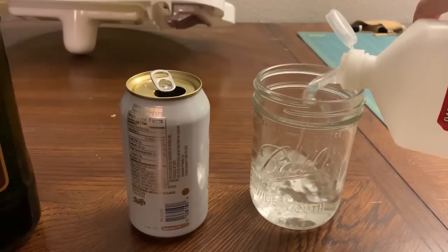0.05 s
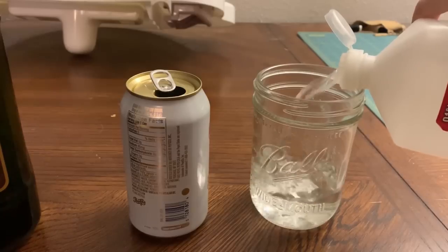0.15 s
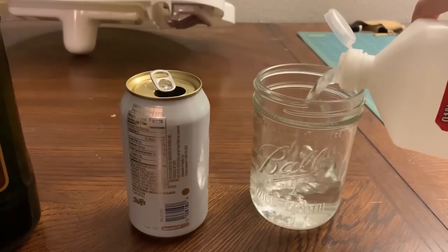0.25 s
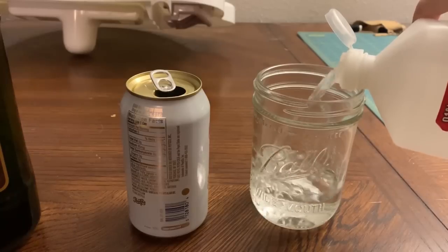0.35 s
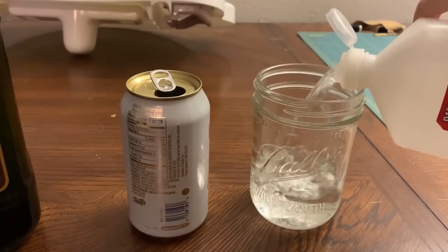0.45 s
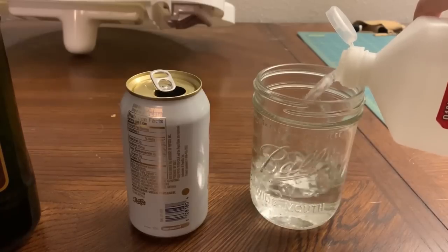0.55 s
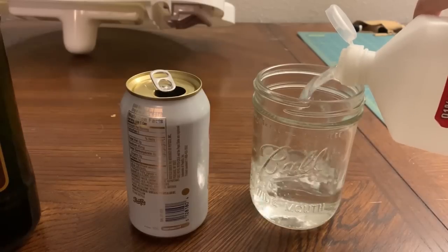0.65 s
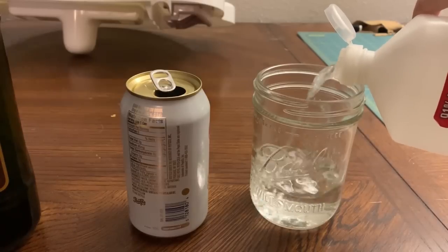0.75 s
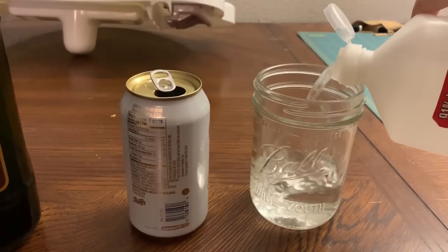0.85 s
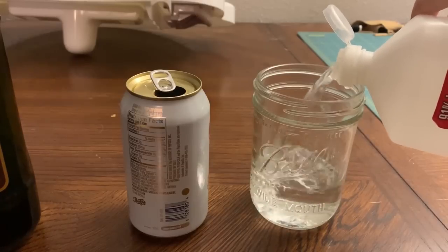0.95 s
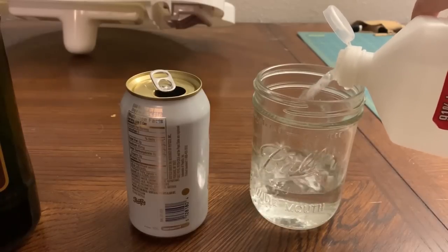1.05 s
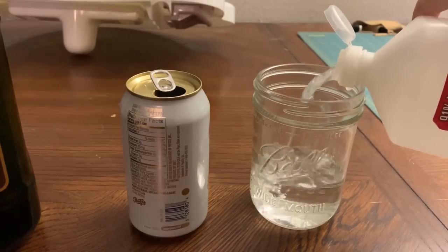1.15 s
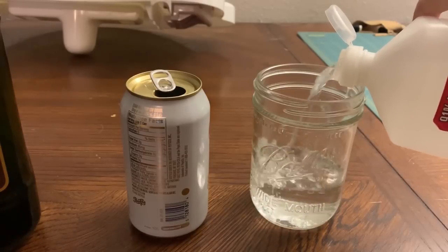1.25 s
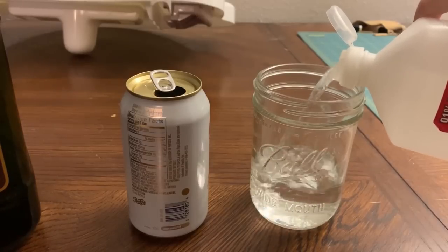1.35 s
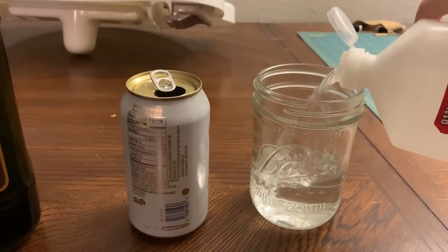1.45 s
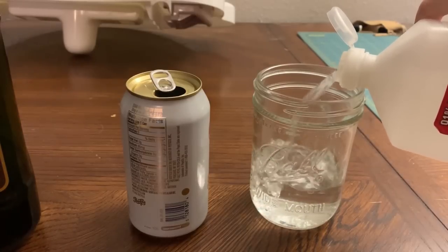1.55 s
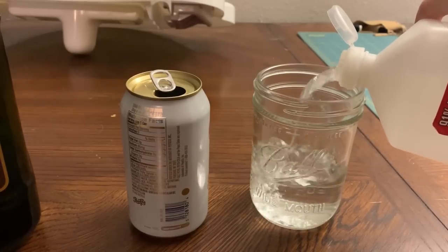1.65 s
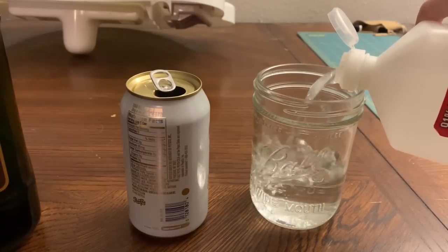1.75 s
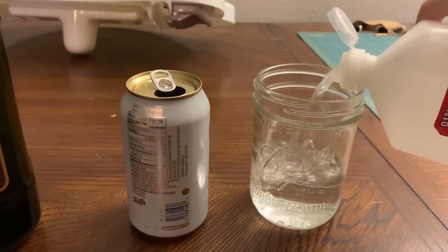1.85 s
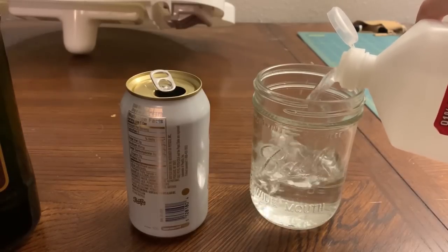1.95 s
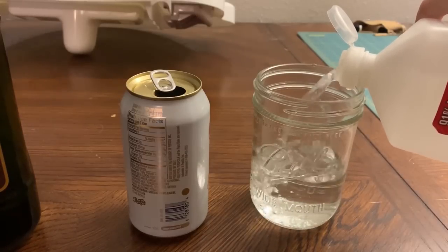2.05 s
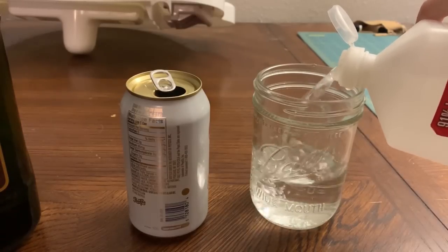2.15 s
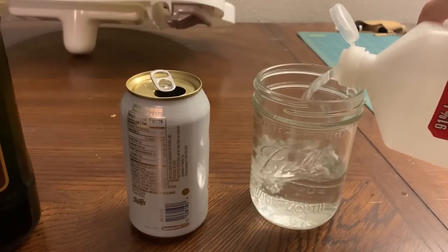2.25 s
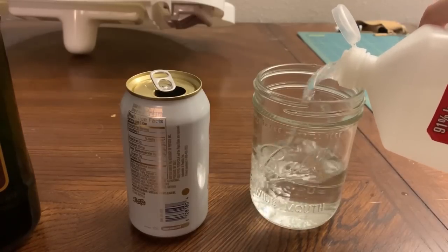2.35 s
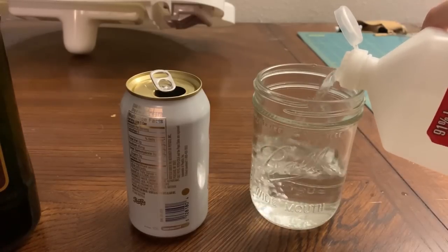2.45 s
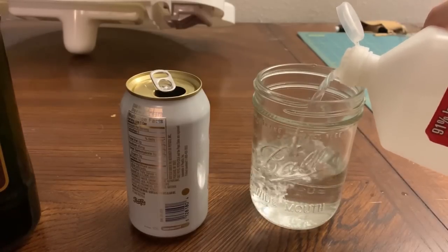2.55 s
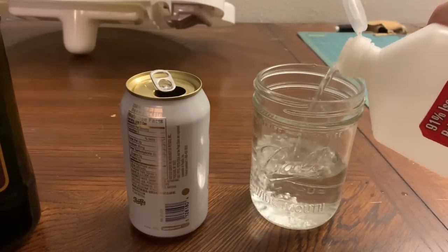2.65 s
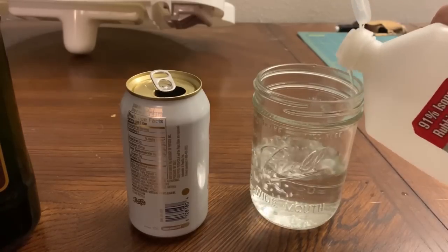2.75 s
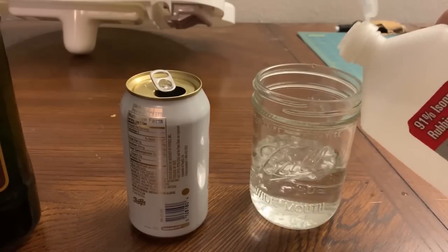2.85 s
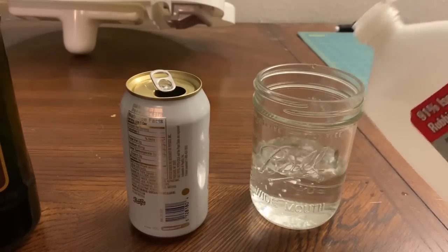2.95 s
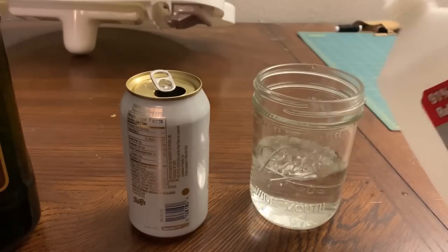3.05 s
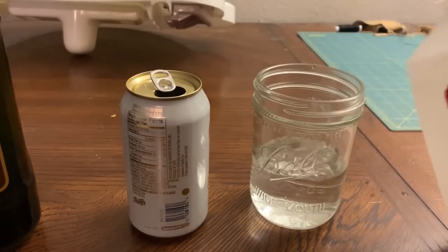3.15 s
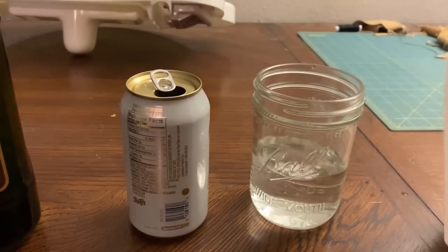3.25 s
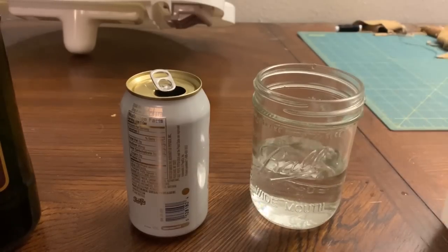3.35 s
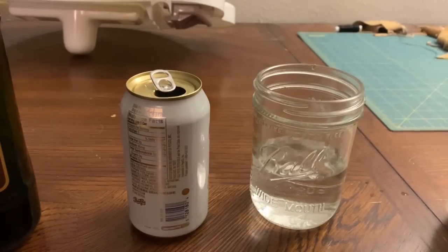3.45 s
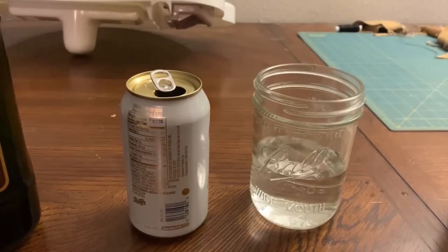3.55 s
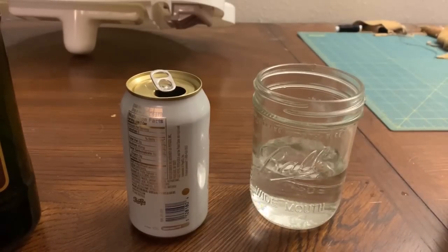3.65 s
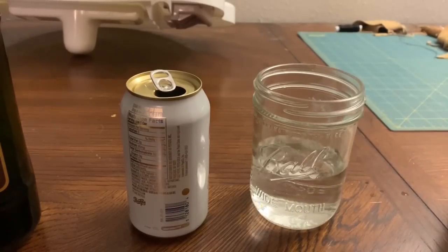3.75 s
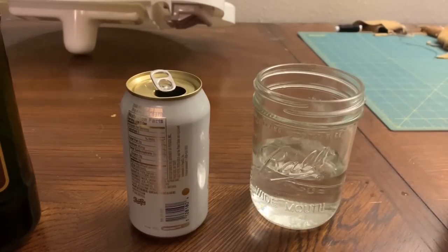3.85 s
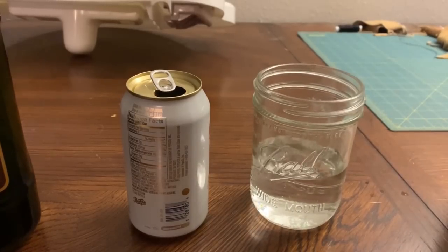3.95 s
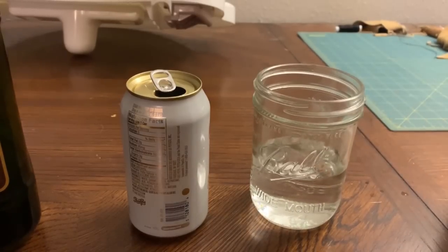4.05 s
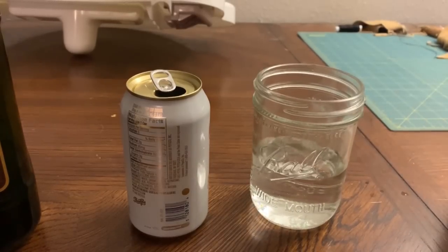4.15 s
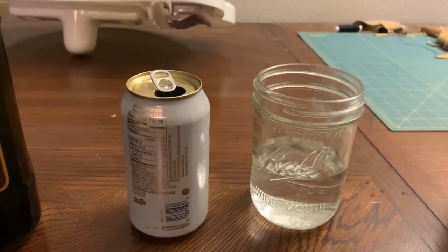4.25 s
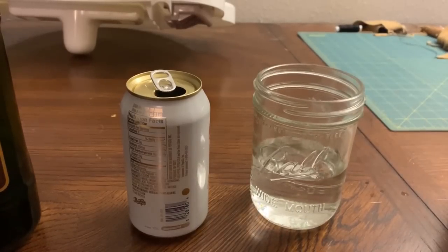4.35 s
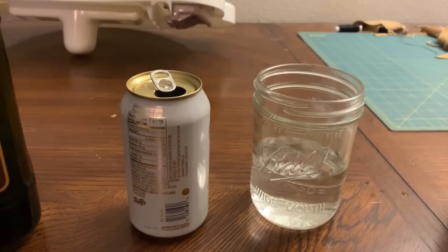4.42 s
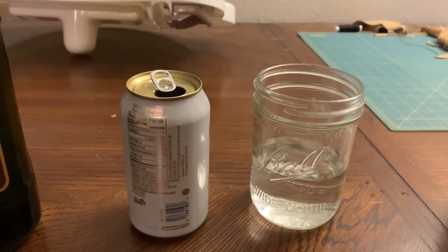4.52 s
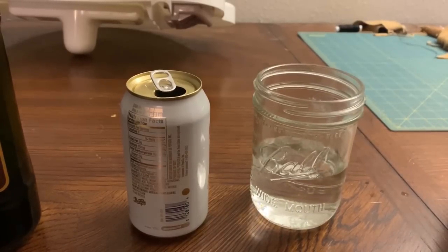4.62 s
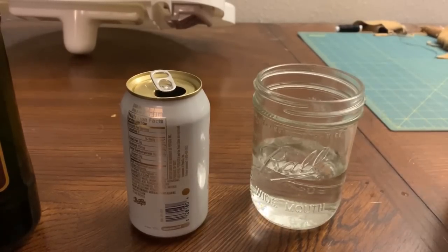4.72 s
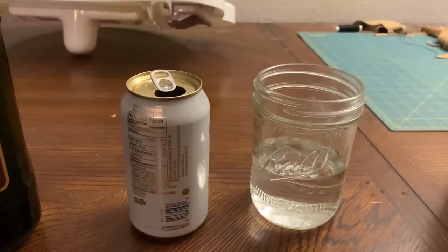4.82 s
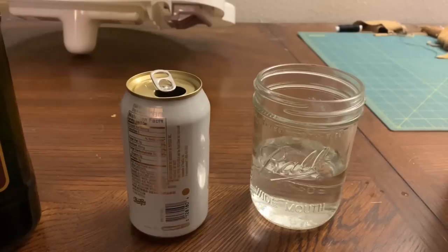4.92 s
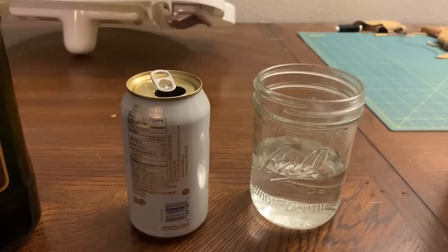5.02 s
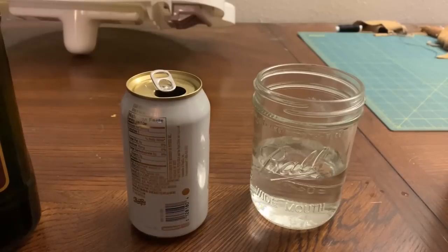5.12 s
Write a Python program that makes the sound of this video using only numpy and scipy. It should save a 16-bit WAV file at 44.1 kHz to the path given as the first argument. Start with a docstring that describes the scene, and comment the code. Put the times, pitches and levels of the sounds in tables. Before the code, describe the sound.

Bubbly pouring into a glass jar tapers to drips, followed by plastic jug bumps, a snapping cap and a hard table thump.

```python
"""Jug poured, then set down

Liquid glugs out of a plastic jug into a glass jar on a wooden table, close to a two-port microphone.
Gulped bubbles are gliding sines with falling pops; splashes are grainy noise, droplet chirps and glass modes.
Then the jug is set down, its cap snaps and it lands hard: ringing modes, noise cracks and ticks.
A hand slides away in filtered noise, over a quiet room and its short reverberation."""
import sys
import numpy as np
from scipy import signal
from scipy.fft import rfft, irfft
from scipy.io import wavfile
from scipy.ndimage import uniform_filter1d

SR = 44100
rng = np.random.default_rng(int(sys.argv[2]) if len(sys.argv) > 2 else 0)


def dump(signal):
    """Clip the signal to [-1, 1] and save it as 16-bit WAV at the path in sys.argv[1]."""
    limited = np.clip(np.atleast_2d(signal).T, -1, 1)
    pcm = np.round(limited * 32767).astype(np.int16)
    wavfile.write(sys.argv[1], SR, pcm)


N = 228634

# Quiet room tone. Each row: frequency in Hz, relative level in dB.
HUSH_SPECTRUM = [(12, -61), (20, 1), (70, 2), (134, -9), (204, -17.5), (1120, -32), (2390, -29.5),
                 (3250, -35), (6010, -51), (6910, -29.5), (7730, -41), (13500, -44), (16000, -83)]
# Liquid sloshing low in the tipped jug. Each row: frequency in Hz, relative level in dB.
RUMBLE_SPECTRUM = [(12, -38), (20, 14), (43, -7), (64, 22.5), (156, 3.5), (239, 17), (292, 13.5),
                   (376, -33), (400, 12.5), (520, 5), (880, -120)]
HUSH_DB, RUMBLE_DB = -57, -56  # rms

# Diffuse sound at the two ports. Each row: frequency in Hz, left-right likeness from -1 to 1.
PORT_LIKENESS = [(60, 0.99), (180, 0.91), (550, 0.52), (1650, -0.042), (4970, 0.15), (15000, -0.079)]
# Reverberation. Each row: frequency in Hz, t60 in seconds.
ROOM_DECAY = [(100, 0.36), (500, 0.21), (2000, 0.29), (5000, 0.31), (12000, 0.13)]
# What the room sends back. Each row: frequency in Hz, gain in dB.
WALL_REFLECTION = [(60, -1.5), (300, -3.5), (800, -0.5), (2000, 0.5), (16000, 0)]
# The ports lose a band near 10 kHz. Each row: frequency in Hz, gain in dB.
MIC_RESPONSE = [(9000, 3), (9800, 0), (10500, -7.5), (11200, -1), (12000, 1), (14800, -4.5), (16000, -29)]
EDGE_HZ = 16450  # top of the band
LEFT_LATE_S = 0.05 / 343  # blows travel 0.05 m further to the left port

# Hand and sleeve strokes. Each row: start in seconds, length in seconds, low scrape level in dB,
# rustle level in dB, fine swish level in dB.
RUB_STROKES = [(2.94, 0.035, -64, -86, -99), (3.069, 0.021, -60, -63.5, -97),
               (3.262, 0.17, -96, -58.5, -52.5), (3.682, 0.042, -76, -63, -52),
               (3.953, 0.015, -84, -67, -47), (4.215, 0.051, -60, -59, -48.5),
               (4.337, 0.054, -86, -96, -102), (4.485, 0.2, -41, -51, -94),
               (4.717, 0.21, -49.5, -62.5, -67), (4.818, 0.084, -40.5, -63.5, -70),
               (4.913, 0.18, -52, -42, -36)]
# Low scrape of a stroke. Each row: frequency in Hz, relative level in dB.
SCRAPE_SPECTRUM = [(88, -55), (150, -14.5), (335, -6), (458, -15), (626, -8.5), (684, -14), (1170, -25),
                   (1730, -16.5), (3000, -37.5), (3900, -66), (6600, -120)]
# Rustle of a stroke. Each row: frequency in Hz, relative level in dB.
RUSTLE_SPECTRUM = [(590, -54), (1000, 3.5), (1280, -9), (1620, 3), (1890, -3), (2240, 4), (3140, 1.5),
                   (3490, 2), (5900, 5.5), (6700, 0.5), (9600, -3.5), (12500, -84), (21100, -120)]
# Fine swish of a stroke. Each row: frequency in Hz, relative level in dB.
SWISH_SPECTRUM = [(6590, -56), (11200, -33), (11700, -11.5), (13300, -12), (14900, -16), (15500, 0),
                  (16500, -37)]
RUB_RISE_SHARE, RUB_T60_S = 0.4, 0.28  # a stroke swells, holds, then fades
RUB_PATCHY_DB = 3.0  # uneven grip
# Faint stirring once the jug is upright; it comes and goes
STIR_FROM_S, STIR_SCRAPE_DB, STIR_RUSTLE_DB, STIR_WAVER_DB = 3.09, -61.5, -68.5, 4.0

# Hard edges meeting within a blow. Each row: start in seconds, level in dB, length in seconds,
# brightness from 0 to 1.
EDGE_TICKS = [(3.308, -50, 0.0069, 0.7), (3.383, -52.5, 0.0052, 0.2), (3.417, -46, 0.0041, .5),
              (3.501, -47, 0.0067, 0), (3.641, -44, 0.0058, 0), (3.923, -25.5, 0.0046, 0),
              (3.926, -30, 0.0033, .5), (3.935, -29.5, 0.0056, 0), (4.112, -15, 0.0069, 0.67),
              (4.118, -23, 0.0023, 0.7), (4.148, -27, 0.0021, 0), (4.551, -7.5, 0.0031, 0.2),
              (4.5553, -18, 0.0026, 0.9), (4.563, -37, 0.0062, 0.2), (4.572, -14, 0.0013, 0.5),
              (4.972, -35, 0.0033, 0.1)]
# Blows on the table. Each row: start in seconds, jug wall level in dB, settled wall note in Hz,
# note t60 in seconds, sag in octaves, thud level in dB, table top level in dB, crack level in dB,
# contact in seconds.
BLOWS = [(2.519, -27, 377.5, 0.057, 1.04, -67, -53, -63, 0.00078),
         (2.924, -34.5, 220, 0.053, 0.34, -65, -56, -48.5, 0.0029),
         (3.017, -45, 235, 0.052, 0.068, -43, -59.5, -84, 0.00083),
         (3.382, -26, 149, 0.052, 1.45, -24, -38.5, -40, 0.00071),
         (3.418, -59, 299, 0.072, .1, -42, -47, -46.5, .0015),
         (3.46, -49, 207, 0.065, 0.63, -44, -57, -49.5, 0.00057),
         (3.496, -26.5, 290, 0.033, 0.57, -33, -44.5, -48, 0.00078),
         (3.527, -29.5, 260, 0.027, 0.28, -31, -38.5, -46, 0.00071),
         (3.57, -33.5, 293, .06, 0.14, -55, -46, -88, 0.0048),
         (3.642, -20.5, 250, 0.065, 0.46, -25.5, -37.5, -44, 0.00082),
         (3.703, -46, 250, 0.076, 0.25, -41, -48, -36.5, 0.0012),
         (3.763, -60, 262.6, 0.071, .1, -41.5, -51, -44.5, .0017),
         (3.817, -37.5, 206, 0.043, 0.17, -35.5, -66, -83, 0.0024),
         (3.922, -54, 820, 0.077, 0.12, -43, -69, -30, 0.00019),
         (4.113, -24.5, 308, 0.041, 0.88, -33, -33.5, -22.5, 0.00069),
         (4.139, -34.5, 201, 0.05, 0.4, -29, -58, -26, 0.0011),
         (4.363, -41.5, 250, 0.062, 0.058, -45, -81, -59, 0.00097),
         (4.552, -12.5, 289.3, 0.062, 1.1, -68, -28, -17, .0012),
         (4.97, -42, 448, 0.087, 0.25, -41, -44.5, -49, 0.00078)]
# Table top modes. Each row: frequency in Hz, relative level in dB, t60 in seconds.
TABLE_MODES = [(103.5, -4, 0.42), (116.7, 2, 0.81), (123, -4, 0.2)]
# Table legs and floor modes. Each row: frequency in Hz, relative level in dB, t60 in seconds.
LEG_MODES = [(31.2, -8.5, 0.72), (65.7, 1.5, 0.12), (92, 4.5, 0.07)]
# Jug wall modes. Each row: frequency in Hz, relative level in dB, t60 in seconds.
JUG_MODES = [(199, -5, 0.041), (250, -3.5, 0.029), (325, -8.5, 0.041), (431, -4.5, 0.019),
             (588, -1.5, 0.014), (792, -6.5, 0.011), (875, -3, 0.012), (1394, 6, 0.0045),
             (1790, 14, 0.0044), (2400, 12, 0.015)]
# Noise of cracks and ticks. Each row: frequency in Hz, relative level in dB.
CRACK_SPECTRUM = [(590, -13), (1000, 0.5), (1220, -22), (1830, 1.5), (2310, 4), (3420, 10), (3750, 7),
                  (4500, 5.5), (5400, -4), (5950, -11), (6800, 1.5), (8260, 2.5), (9720, -1), (10700, -9.5),
                  (12800, -6.5), (14900, -5), (16000, -41)]
# Cap, neck and wall ringing after the sharpest blows. Each row: start in seconds, frequency in Hz,
# level in dB, t60 in seconds.
CAP_RINGS = [(3.924, 2600, -31, .04), (3.925, 870, -33, 0.036), (3.928, 4760, -31.5, 0.14),
             (3.925, 8850, -33, 0.033), (3.927, 1800, -40, 0.089), (4.114, 6200, -32, 0.09),
             (4.115, 3665, -23, 0.16), (4.113, 6850, -23.5, .04), (4.113, 8300, -24, 0.032),
             (4.113, 707, -14.5, 0.027), (4.113, 960, -17, 0.028), (4.113, 1390, -22, 0.018),
             (4.143, 1560, -14.5, 0.0052), (4.5515, 1840, -1.5, 0.012), (4.5525, 618, -3, 0.022),
             (4.556, 1750, -32, .11), (4.559, 4350, -29, 0.2), (4.553, 5380, -32, .06),
             (4.552, 9000, -16.5, 0.019), (4.552, 6700, -23, 0.017)]
# Liquid thrown about in the jug. Each row: frequency in Hz, relative level in dB.
SLOSH_SPECTRUM = [(40, -20), (90, -0.5), (250, 2), (450, -2.5), (800, -7), (1200, -14), (2200, -37)]
SLOSH_DB, SLOSH_T60_S = -7, 0.22  # relative to the wall's level
CRACK_T60_S = 0.01
WALL_SAG_S = 0.0081  # the wall note starts high and drops as the dent springs back
CAP_FLUTTER = 0.52  # a loose cap rings unevenly

# Surges and last drips landing in the jar. Each row: start in seconds, level in dB before brightness
# weights it, t60 in seconds (10 ms at least), brightness in dB, pitch of the loudest droplet in Hz.
SPLASH_BURSTS = [(.028, -23.5, 0.021, 7.5, 2100), (0.0493, -23.5, 0.012, 7, 2280),
                 (0.0765, -29.5, 0.0092, 27, 7800), (0.128, -54, 0.044, -9, 2700),
                 (0.173, -35.5, 0.059, 4, 2640), (0.2094, -28, 0.071, 7.5, 7450),
                 (0.3576, -48, 0.12, 10, 4030), (0.369, -26.5, 0.048, 3.5, 4030),
                 (0.373, -15, 0.019, 5, 4720), (0.4437, -22, 0.045, 6.5, 7800),
                 (0.535, -36.5, 0.042, 0, 4770), (0.5553, -30, 0.056, 2, 2300),
                 (0.632, -34.5, 0.032, 11, 5230), (.651, -25.5, 0.02, -4.5, 2250),
                 (0.69, -27.5, 0.022, 13, 8420), (0.719, -45, 0.44, 2, 3900),
                 (0.782, -22, 0.041, 5.5, 3850), (0.916, -28.5, 0.049, -8.5, 2200),
                 (1.039, -23.5, 0.042, 8.5, 3800), (1.0548, -25.5, 0.057, 1, 6460),
                 (1.1661, -29.5, 0.027, -2, 4930), (1.254, -46, 0.27, -10.5, 2420),
                 (1.389, -37.5, 0.047, -2.5, 3830), (1.415, -28.5, 0.045, 11.5, 2700),
                 (1.5467, -29.5, 0.068, -1, 2400), (1.608, -36.5, 0.027, -1, 9050),
                 (1.6303, -29.5, 0.043, 7.5, 3900), (1.6594, -31, 0.036, -1.5, 5160),
                 (1.684, -32, 0.026, -5.5, 2760), (1.7728, -32.5, 0.052, 2, 2700),
                 (1.792, -35, 0.078, -0.5, 2830), (1.836, -26.5, 0.018, 5, 8200),
                 (1.8684, -27, 0.014, -8.5, 6840), (1.9282, -35, 0.052, 15, 1900),
                 (1.933, -39, 0.017, -13, 7550), (2.0297, -27.5, 0.043, -2, 2770),
                 (2.165, -26, 0.039, 3, 6270), (2.252, -57, 0.15, -11, 3800), (2.276, -31, 0.073, 1, 2770),
                 (2.3538, -31, 0.013, 5, 4040), (2.3944, -35.5, 0.026, 20, 7300),
                 (2.432, -49.5, 0.095, -8.5, 2590), (2.559, -53, 0.6, -6.5, 4000),
                 (2.612, -46, 0.083, -4, 4300), (2.6328, -33.5, 0.039, -4, 2720),
                 (2.776, -54, 0.0093, 6, 7500), (2.827, -50, 0.013, 7, 6300),
                 (2.872, -38.5, 0.053, 4, 2320), (2.9182, -28, 0.014, 2, 7600),
                 (3.081, -45, 0.031, -6, 4200)]
# The stream between surges. Each row: time in seconds, fizz level in dB, air in the jar in dB.
STREAM_LEVELS = [(0, -48.5, -52.5), (.24, -53, -61), (.6, -53, -51), (1.0, -51, -75), (1.25, -54, -56),
                 (1.5, -55, -62.5), (1.7, -60, -60.5), (2.08, -53, -55.5), (2.22, -52, -60),
                 (2.36, -59, -55.5), (2.47, -60.5, -65), (2.58, -83, -64), (2.7, -102, -64),
                 (2.8, -102, -99)]
# Jar modes. Each row: frequency in Hz, relative level in dB, t60 in seconds.
GLASS_MODES = [(1933, 0, 0.076), (2400, -2, 0.049), (2789, 3, 0.084), (3820, 4, 0.057), (4760, -3, 0.043),
               (6560, 5, 0.019), (8330, 10.5, 0.0097)]
# Fizz of spray and bubbles. Each row: frequency in Hz, relative level in dB.
FIZZ_SPECTRUM = [(530, -4.5), (900, -5), (1720, -14.5), (2830, -7), (3340, -23.5), (3770, -3.5),
                 (4740, -10.5), (5680, -16), (6640, -6.5), (8450, -6), (10500, -11), (13400, -12),
                 (16000, -32)]
# Finest spray bursting at the surface. Each row: start in seconds, level in dB.
SPIT_BURSTS = [(0.0752, -43), (0.2109, -34), (0.2423, -44), (0.2793, -44), (0.3182, -66), (0.375, -38),
               (0.412, -46), (0.4434, -26), (0.5541, -46), (0.5691, -43), (0.5944, -54), (0.6509, -49),
               (0.6898, -36), (0.7193, -48), (0.7497, -41), (0.7846, -28), (0.9258, -40), (1.0375, -35),
               (1.0575, -27), (1.1134, -48), (1.2925, -37), (1.3967, -45), (1.4212, -40), (1.5524, -44),
               (1.6297, -48), (1.6611, -45), (1.7958, -46), (1.8477, -44), (1.8754, -54), (1.927, -34),
               (1.938, -25), (2.0348, -51), (2.1635, -40), (2.1764, -44), (2.1864, -41), (2.2677, -47),
               (2.2777, -40), (2.359, -49), (2.394, -37), (2.4394, -52)]
# Noise of the finest spray. Each row: frequency in Hz, relative level in dB.
SPIT_SPECTRUM = [(6000, -30), (9000, -16), (12000, -1), (13800, 3), (15200, -6), (16300, -20), (17000, -80)]
SPIT_T60_S = 0.022
SPLASH_RISE_S = 0.0051
SPLASH_LEAD_S, SPLASH_LEAD_DB = 0.0099, -20  # first drops arrive ahead of a surge
# Loudest droplet against its splash at 2.5 kHz; small ones stand out more
DROPLET_DB, DROPLET_DB_PER_OCTAVE = -15, 8.5
AIR_HZ, AIR_HZ_PER_S = 690, 98  # the air column shortens as the jar fills
GLASS_WANDER, GLASS_WANDER_S = 0.03, 0.05  # rms share of pitch, smoothing time

# Air bubbles gulped into the jug. Each row: start in seconds, level in dB, pitch in Hz,
# t60 in seconds (6 ms at least), rise in seconds, glide in octaves either side of the pitch, pop level in dB.
GULPED_BUBBLES = [(.005, -39, 705, 0.024, 0.0072, 0.1, -54), (.052, -35.5, 743, 0.014, 0.006, 0.22, -61),
                  (.062, -25, 599, 0.0086, .009, 0.021, -45), (.16, -38.5, 690, 0.015, .009, -0.16, -48),
                  (.183, -37.5, 660, 0.019, .009, -0.028, -59), (.199, -36, 477, 0.0077, 0.0094, 0.23, -39),
                  (0.253, -35, 1300, 0.019, 0.0064, 0.79, -55), (.335, -44, 420, 0.018, 0.012, 0.44, -67),
                  (.371, -32, 745, 0.017, .008, -0.63, -57), (.4, -47, 620, .05, 0.012, 0.15, -57),
                  (.446, -33.5, 462, 0.098, 0.0088, -0.25, -39), (.489, -47, 910, 0.038, 0.016, 1.3, -67),
                  (0.57, -26, 567, 0.0058, 0.0094, -0.22, -32.5),
                  (.654, -31.5, 784, 0.11, 0.0043, 0.063, -35),
                  (.69, -30.5, 497, 0.052, 0.0088, -0.41, -37), (0.773, -37, 788, 0.066, .007, 0.0046, -43),
                  (.798, -40, 690, 0.013, 0.0054, 0.14, -52), (.812, -36, 637, 0.0079, 0.0063, -.2, -38),
                  (0.828, -36.5, 446, 0.015, 0.012, 0.15, -48), (0.922, -32, 769, 0.015, 0.0073, 0.18, -49),
                  (.933, -40, 680, .012, 0.004, -0.74, -55), (0.949, -33, 478, .011, 0.015, 0.51, -50),
                  (1.008, -50, 477, .03, 0.0088, .1, -63), (1.055, -45.5, 747, .03, 0.0083, 0.36, -42.5),
                  (1.076, -31, 466, 0.0061, 0.0081, 0.17, -56),
                  (1.168, -38.5, 745, 0.016, 0.0057, -.2, -46), (1.199, -37, 456, .015, 0.013, 0.35, -39),
                  (1.247, -35.5, 658, 0.025, 0.0061, 0.37, -38),
                  (1.297, -37.5, 762, 0.026, 0.0077, 0.23, -48),
                  (1.326, -38.5, 463, 0.011, 0.0097, 0.11, -52),
                  (1.414, -30, 810, 0.0054, 0.00436, -0.54, -29),
                  (1.444, -41.5, 492, .018, 0.0088, 0.31, -42),
                  (1.557, -32, 632, 0.0059, 0.0072, -0.43, -35),
                  (1.661, -28.5, 451, 0.039, 0.0065, -0.087, -51),
                  (1.693, -36.5, 446, 0.012, 0.0081, -0.13, -33.5),
                  (1.798, -25, 724, 0.02, 0.0044, -0.57, -29), (1.838, -41, 650, 0.05, 0.0072, -0.2, -44),
                  (1.928, -44.5, 680, 0.021, 0.0049, -0.71, -38),
                  (1.945, -39.5, 460, 0.013, 0.011, 0.12, -35),
                  (2.034, -41.5, 610, 0.017, 0.0067, -0.46, -35.5),
                  (2.165, -31, 735, 0.014, 0.0036, -0.56, -33),
                  (2.226, -39.5, 1020, 0.02, 0.0059, 0.98, -42), (2.278, -29, 585, 0.027, 0.0028, -.1, -32),
                  (2.393, -48.5, 570, 0.056, 0.006, 0.13, -52),
                  (2.644, -40.5, 568, 0.018, 0.0048, -0.22, -37)]
# The jug while it holds liquid. Each row: frequency in Hz, relative level in dB, t60 in seconds.
NECK_MODES = [(239, 3.5, 0.1), (297, 3.5, 0.055), (640, 14.5, 0.011), (910, -10, 0.018),
              (1447, 0.5, 0.0099)]
GLUG_GLIDE_S = 0.016  # time over which a note slides to its new pitch
GLUG_HOLD_CYCLES = 1.55  # cycles at full strength before the note dies
CHURN_DB, CHURN_T60_S = -47, 0.11  # liquid tumbles in the jug after each gulp
# The neck clears with a quick falling pop
POP_TOP_HZ, POP_END_HZ, POP_FALL_S, POP_T60_S = 1300, 260, 0.00477, 0.038


def amp(db):
    """Turns decibels into gain."""
    return 10 ** (np.asarray(db) / 20)


def evened(x):
    """Scales to rms 1."""
    return x / np.sqrt(np.mean(x ** 2) + 1e-20)


def read(points, hz):
    """Reads a table on a log-frequency axis."""
    f, value = np.transpose(points)
    return np.interp(np.log(hz + 1), np.log(f + 1), value)


def curves(rows):
    """Draws each column as a curve over every sample, with -120 outside its span."""
    s, *columns = np.transpose(rows)
    return [np.interp(np.arange(N) / SR, s, c, left=-120, right=-120) for c in columns]


def add(mix, s, sound):
    """Mixes a sound in at a time in seconds."""
    part = mix[max(round(s * SR), 0):][:len(sound)]
    part += sound[:len(part)]


def coloured(x, points):
    """Filters by a spectrum in dB, then scales to rms 1."""
    hz = np.fft.rfftfreq(x.shape[-1], 1 / SR)
    return evened(irfft(rfft(x) * amp(read(points, hz)), x.shape[-1]))


def paired(x):
    """Blends two unrelated signals so that bass is common to both ports."""
    size = x.shape[-1]
    same = np.clip(read(PORT_LIKENESS, np.fft.rfftfreq(size, 1 / SR)), -1, 1)
    a, b = rfft(x)
    return irfft(np.array([a, same * a + np.sqrt(1 - same ** 2) * b]), size)


def ring(modes, length=0.8):
    """Sums the dying sines of a struck thing; neighbouring modes start in opposite directions."""
    t = np.arange(round(length * SR)) / SR
    out = np.zeros(len(t))
    for k, (hz, db, t60) in enumerate(modes):
        out += (-1) ** k * amp(db - 60 * t / t60) * np.sin(2 * np.pi * hz * t)
    return out


def random_hits(per_s, spread_db):
    """Scatters single-sample hits of random strength."""
    strength = amp(spread_db * np.minimum(rng.exponential(1, N), 4))
    return strength * (rng.random(N) < per_s / SR)


def grainy(per_s, spread_db, smooth):
    """Noise whose level jumps in short random grains over a smooth floor."""
    grain = np.exp(-np.arange(400) / 70)
    shape = smooth + signal.oaconvolve(random_hits(per_s, spread_db), grain)[:N]
    return evened(shape * rng.standard_normal(N))


def patchy(x, depth_db):
    """Lets random patches of time and pitch swell and sink."""
    z = signal.stft(x, nperseg=256)[2]
    patches = rng.standard_normal(z.shape[::-1])
    patches = uniform_filter1d(patches, size=6, axis=0)
    patches = uniform_filter1d(patches, size=8, axis=1)
    return evened(signal.istft(z * amp(depth_db * evened(patches).T), nperseg=256)[1][:N])


def hush():
    """The quiet room, and the low slosh of liquid while the jug is tipped, as coloured noise."""
    pouring = np.interp(np.arange(N) / SR, [2.6, 2.8], [1, 0])
    a, b = rng.standard_normal((2, 2, N))
    quiet = amp(HUSH_DB) * coloured(a, HUSH_SPECTRUM)
    rumble = amp(RUMBLE_DB) * pouring * coloured(b, RUMBLE_SPECTRUM)
    return paired(quiet + rumble)


def room(x):
    """Three tails of sparse taps take turns, each band dying at its own speed."""
    out = 0
    x = irfft(rfft(x) * amp(read(WALL_REFLECTION, np.fft.rfftfreq(N, 1 / SR))), N)
    for k in range(3):
        taps = np.zeros((2, SR // 2))
        slots = np.arange(200, SR // 2 - 20, 20)
        at = slots + rng.integers(0, 20, (2, len(slots)))
        np.put_along_axis(taps, at, rng.choice([-1., 1.], at.shape), 1)
        hz, t, z = signal.stft(taps, SR, nperseg=256)
        decay = amp(-60 * t / read(ROOM_DECAY, hz)[:, None])
        tail = paired(signal.istft(z * decay, SR, nperseg=256)[1])
        turn = np.sqrt(2 / 3) * np.cos(2 * np.pi * (9 * np.arange(N) / SR + k / 3))
        tail = tail / np.linalg.norm(tail[0])
        out = out + signal.fftconvolve((x * turn)[None], tail, axes=1)[:, :N]
    return out


def rubs():
    """Skin and cloth dragging over wood and plastic: swelling strokes of grainy, patchy noise."""
    t, levels = np.arange(N) / SR, np.zeros((3, N))
    waver = amp(STIR_WAVER_DB * evened(uniform_filter1d(rng.standard_normal(N), size=3000)))
    stir = np.clip((t - STIR_FROM_S) / 0.37, 0, 1) * waver
    levels[:2] += amp([[STIR_SCRAPE_DB], [STIR_RUSTLE_DB]]) * stir
    for s, length, *dbs in RUB_STROKES:
        swell = np.clip((t - s) / (RUB_RISE_SHARE * length), 0, 1) ** 2
        fade = amp(-60 * np.maximum(t - s - length, 0) / RUB_T60_S)
        levels += amp(dbs)[:, None] * swell * fade
    out = np.zeros((2, N))
    for level, colour in zip(levels, (SCRAPE_SPECTRUM, RUSTLE_SPECTRUM, SWISH_SPECTRUM)):
        grains = np.array([patchy(grainy(900., 2.5, 3.), RUB_PATCHY_DB) for port in "LR"])
        out += level * coloured(grains, colour)
    return paired(out)


def ticks():
    """Hard edges meet in very short bursts of crack noise, duller or brighter."""
    out = np.zeros((2, N))
    noise = coloured(rng.standard_normal(size=(len(EDGE_TICKS), 2000)), CRACK_SPECTRUM)
    for (s, db, length, bright), hiss in zip(EDGE_TICKS, noise):
        burst = np.hanning(round(length * SR))
        hiss = evened(hiss - np.clip(bright, 0, 1) * uniform_filter1d(hiss, size=7))
        for port, late in zip(out, (LEFT_LATE_S, 0)):
            add(port, s + late, amp(db) * burst * hiss[:len(burst)])
    return out


def cap_rings():
    """The cap, neck and wall ring on in pairs of close modes that beat and flutter."""
    out = np.zeros((2, N))
    for s, hz, db, t60 in CAP_RINGS:
        pair = ring([(hz, db, t60), (hz * 1.02, db - 6, t60 * 0.6)], length=0.25)
        flutter = evened(uniform_filter1d(rng.standard_normal(len(pair)), size=300))
        onset = np.minimum(np.arange(len(pair)) / 400, 1)
        pair = pair * (1 + CAP_FLUTTER * flutter * onset)
        add(out[0], s + 0.00013, pair)
        add(out[1], s, pair)
    return out


def jug_wall(jug, hz, note_t60, sag, contact, t):
    """A dented plastic wall springs back: modes, a sagging note and liquid thrown about inside."""
    chatter = rng.standard_normal(2000) * 0.15 * np.exp(-t[:2000] / 0.0047)  # loose contact after the blow
    rattle = signal.unit_impulse(2000) + chatter
    push = np.hanning(max(round(contact * SR), 1) + 2)  # a longer contact is a duller blow
    push = push / push.sum()
    modes = signal.oaconvolve(jug[:len(t)], np.convolve(rattle, push))[:len(t)]
    turns = np.cumsum(hz * 2 ** (sag * np.exp(-t / WALL_SAG_S))) / SR
    note = amp(3.0 - 60 * t / note_t60) * np.sin(2 * np.pi * turns)
    note = np.convolve(note, push)[:len(t)]
    slosh = amp(SLOSH_DB - 60 * t / SLOSH_T60_S) * coloured(rng.standard_normal(len(t)), SLOSH_SPECTRUM)
    bend = 1 - np.exp(-t / 0.0028)  # the wall bends in before it rings
    return (modes + note + slosh) * bend


def knocks():
    """Each blow rattles the jug wall, swings the table and leaves a crack of noise; the cap rings on."""
    out, t = cap_rings(), np.arange(12000) / SR
    noise = coloured(rng.standard_normal(size=(len(BLOWS), 3, len(t))), CRACK_SPECTRUM)
    jug, top, legs = ring(JUG_MODES, length=0.3), ring(TABLE_MODES), ring(LEG_MODES)
    swing = 1 - np.exp(-np.arange(len(top)) / SR / 0.0041)  # the heavy top takes time to swing
    crack_fade = (1 - np.exp(-t / 0.00081)) * (amp(-60 * t / CRACK_T60_S) + 0.69 * np.exp(-t / 0.0066))
    for blow, (shared, *port_noise) in zip(BLOWS, noise):
        s, db, hz, note_t60, sag, thud_db, top_db, crack_db, contact = blow
        wall = amp(db) * jug_wall(jug, hz, note_t60, sag, contact, t)
        table = swing * (amp(thud_db) * legs + amp(top_db) * top)
        for port, late, own in zip(out, (LEFT_LATE_S, 0), port_noise):
            add(port, s, table)
            add(port, s + late, wall)
            add(port, s + late, amp(crack_db) * crack_fade * (shared + 0.49 * own))
    return out


def spits():
    """The finest spray bursts at the surface: tiny dry noises at the very top of the range."""
    t, out = np.arange(2000) / SR, np.zeros(N)
    noise = coloured(rng.standard_normal(size=(len(SPIT_BURSTS), len(t))), SPIT_SPECTRUM)
    for (s, db), hiss in zip(SPIT_BURSTS, noise):
        add(out, s, amp(db - 60 * t / SPIT_T60_S) * (1 - np.exp(-t / 0.00067)) * hiss)
    return out


def blip(hz, cycles, glide):
    """One small bubble: a soft start, a rising pitch, a few cycles of decay."""
    turns = np.arange(round(4 * cycles / hz * SR)) / SR * hz
    shape = (1 - np.exp(-turns / 2.0)) * np.exp(-turns / cycles)
    return shape * np.sin(2 * np.pi * turns * (1 + glide * turns / cycles))


def droplets(per_s, spread_db, count=36):
    """Small bubbles of scattered size, each size on its own sparse train."""
    out, size = np.zeros(N), rng.integers(0, count, N)
    hits = random_hits(per_s, spread_db)
    for k, hz in enumerate(np.geomspace(1500, 14000, count)):
        a, b = rng.random(2)
        bubble = amp(read(FIZZ_SPECTRUM, hz)) * np.sqrt(hz) * blip(hz, 3. + 8. * a, 0.025 * b)
        out += signal.oaconvolve(hits * (size == k), bubble)[:N]
    return evened(out)


def wet_glass(drive):
    """The jar's modes, each drifting in pitch as the sloshing liquid loads the wall."""
    drift = rng.standard_normal((len(GLASS_MODES), N))
    drift = uniform_filter1d(drift, size=round(GLASS_WANDER_S * SR), axis=1)
    out = np.zeros(N)
    for (hz, db, t60), wander in zip(GLASS_MODES, drift):
        # A decaying filter in a frame that turns at the drifting pitch
        turn = np.exp(2j * np.pi * np.cumsum(hz * (1 + GLASS_WANDER * evened(wander))) / SR)
        out += amp(db) * (turn * signal.lfilter([1], [1, -amp(-60 / (t60 * SR))], drive / turn)).real
    return out


def jar_air():
    """Grainy noise through one resonance, rising in pitch as the air column shortens."""
    turn = np.exp(2j * np.pi * np.cumsum(AIR_HZ + AIR_HZ_PER_S * np.arange(N) / SR) / SR)
    r = np.exp(-np.pi * 110. / SR)  # 110 Hz bandwidth
    return evened((turn * signal.lfilter([1 - r], [1, -r], grainy(500., 3.5, 0.25) / turn)).real)


def splash():
    """Bursts of spray and bubbles over fizz tickle the glass, with the air column sounding above."""
    fizz_db, air_db = curves(STREAM_LEVELS)
    dull, bright, plinks = amp(fizz_db), np.zeros(N), np.zeros(N)
    t = np.arange(8000) / SR
    rise = SPLASH_RISE_S
    for s, db, t60, tilt_db, hz in SPLASH_BURSTS:
        burst = amp(db - 60 * t / max(t60, 0.01)) * (1 - np.exp(-t / rise))
        lead = amp(db + SPLASH_LEAD_DB - abs(tilt_db)) * np.exp(-t[2000::-1] / SPLASH_LEAD_S)
        add(dull, s - t[2000], lead[max(2000 - round(s * SR), 0):])  # trimmed at the start of the scene
        add(dull, s - rise / 2, burst * amp(-tilt_db))
        add(bright, s - rise / 2, burst * amp(tilt_db - 3.5))
        drop_db = DROPLET_DB + DROPLET_DB_PER_OCTAVE * np.log2(hz / 2500)
        add(plinks, s, amp(db + drop_db) * blip(hz, 12.8, 0.013))
    drops = patchy(grainy(500., 2.4, 0.2), 6.34)
    sharp_drops = np.diff(drops, 2, prepend=[0, 0])  # differencing lifts the treble
    spray = amp(-14.) * dull * coloured(drops, FIZZ_SPECTRUM)
    spray += bright * coloured(sharp_drops, FIZZ_SPECTRUM)
    bubbles = amp(-5.5) * dull * droplets(4500., 4.75)
    glass = wet_glass(dull * grainy(600.0, 3.4, 0.2))
    glass *= amp(-6.5) * np.std(bubbles) / np.std(glass)  # set against the bubbles
    return spits() + spray + bubbles + plinks + glass + amp(air_db) * jar_air()


def glugs():
    """Each bubble pops free of the neck, sings a short gliding note and thumps the jug wall."""
    bubbles, thumps = np.zeros((2, N))
    t = np.arange(8000) / SR
    fall = np.cumsum(POP_END_HZ + (POP_TOP_HZ - POP_END_HZ) * np.exp(-t / POP_FALL_S)) / SR
    pop = (1 - np.exp(-t / 0.00081)) * amp(-60 * t / POP_T60_S) * np.sin(2 * np.pi * fall)
    for s, db, hz, t60, rise, octaves, pop_db in GULPED_BUBBLES:
        swell = np.sin(np.pi / 2 * np.minimum(t / rise, 1)) ** 2
        since_hold = np.maximum(t - rise - GLUG_HOLD_CYCLES / hz, 0)
        shape = swell * amp(-60 * since_hold / max(t60, 0.006))
        turns = np.cumsum(hz * 2 ** (octaves * np.tanh((t - rise) / GLUG_GLIDE_S))) / SR
        add(bubbles, s - rise / 2, amp(db) * shape * np.sin(2 * np.pi * turns))
        add(bubbles, s - rise / 2, amp(pop_db) * pop)
        add(thumps, s, amp([db]))
    churn = signal.oaconvolve(thumps, amp(-60 * t / CHURN_T60_S))[:N] * grainy(700., 2.3, 0.23)
    drive = amp(-18.0) * thumps + amp(CHURN_DB) * churn
    return bubbles + signal.oaconvolve(drive, ring(NECK_MODES))[:N]


def scene():
    """The jar reaches the left port a moment before the right; blows come from the right."""
    gulps, spray, blows = glugs(), splash(), knocks() + ticks()
    pour = gulps + spray
    near = np.array([pour, np.roll(pour, shift=2)]) * amp([[0.15], [-0.15]])
    room_send = amp(-7.0) * gulps + amp(-11.5) * spray + amp(-4) * blows.mean(0)
    return near + blows + room(room_send) + rubs() + hush()


def record(dry):
    """Port colour; loud peaks round off under full scale; then the band limit."""
    heard = irfft(rfft(dry) * amp(read(MIC_RESPONSE, np.fft.rfftfreq(N, 1 / SR))), N)
    soft = 0.99 * np.tanh(heard / 0.99)
    edge = signal.firwin(511, EDGE_HZ, window=("kaiser", 9), fs=SR)
    return signal.oaconvolve(soft, edge[None], "same")


dry = scene()
out = record(dry)
dump(out)
```